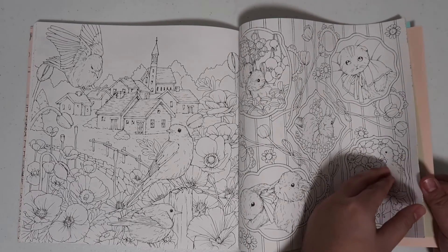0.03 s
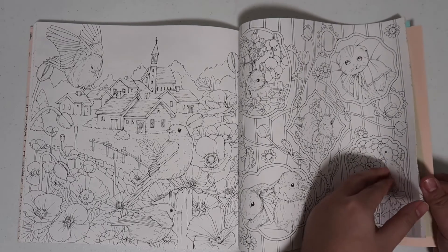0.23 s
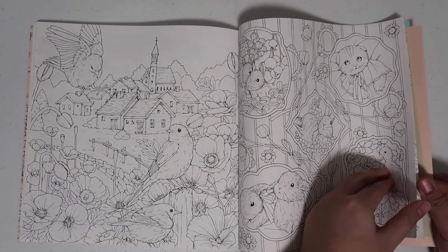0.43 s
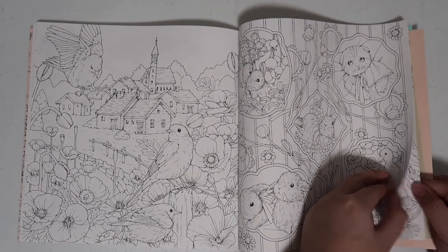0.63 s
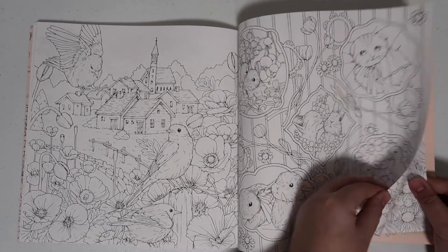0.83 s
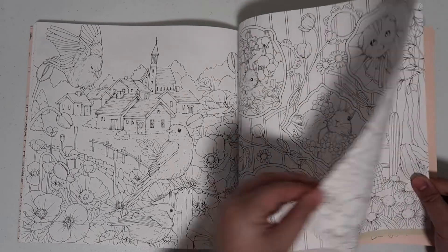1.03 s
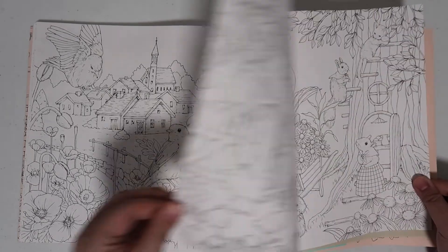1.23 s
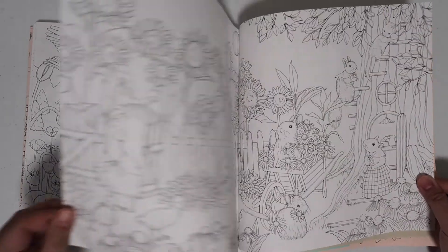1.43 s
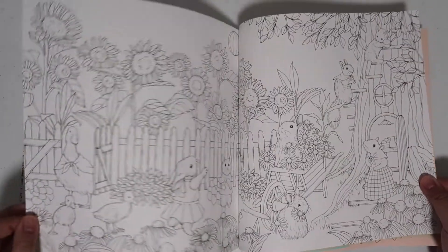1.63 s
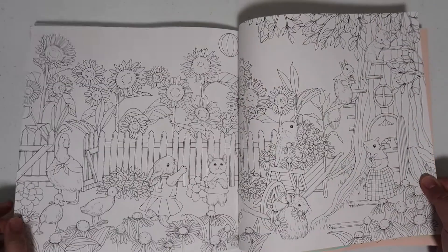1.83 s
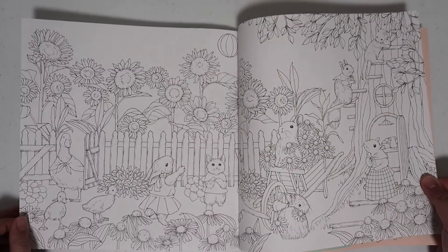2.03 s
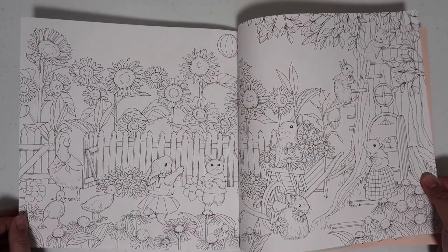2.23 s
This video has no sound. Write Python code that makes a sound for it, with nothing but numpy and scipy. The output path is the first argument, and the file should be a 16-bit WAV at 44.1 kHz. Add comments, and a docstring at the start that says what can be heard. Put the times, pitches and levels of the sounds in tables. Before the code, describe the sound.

A large paper page is turned with a short slide and crisp crackles.

```python
"""A page of a large paper book is turned on a table in a quiet room, over mains hum and low room noise.
First the paper ticks and snaps lightly, and a finger flicks the corner free. The sheet slides off its
neighbour with a hiss of stick-slip friction, then buckles in a run of snaps that deepen as it swings
over; the table and the room reflect each one. Last it settles with faint ticks, soft pats and a brush."""
import sys
import numpy as np
from scipy import signal
from scipy.fft import rfft, irfft, next_fast_len
from scipy.io import wavfile
from scipy.ndimage import map_coordinates

SR = 44100
rng = np.random.default_rng(int(sys.argv[2]) if len(sys.argv) > 2 else 0)


def generate_wav(sig):
    """Save sig (samples, or channels by samples) to the path in sys.argv[1] as 16-bit PCM at SR."""
    pcm = np.round(np.clip(np.atleast_2d(sig).T, -1, 1) * 32767).astype(np.int16)
    wavfile.write(sys.argv[1], SR, pcm)


N = 101429
TIME = np.arange(N) / SR


def amp(db):
    """Amplitude ratio of a level in decibels."""
    return 10 ** (np.asarray(db) / 20)


def unit(x):
    """Normalisation to rms 1."""
    return x / np.sqrt(np.mean(x ** 2) + 1e-20)


def along(points, hz):
    """Interpolation of (f/Hz, value) points on a logarithmic frequency axis."""
    f, values = np.transpose(points)
    return np.interp(np.log(hz + 1), np.log(f + 1), values)


def envelope(points):
    """Amplitude envelope through (t/s, level/dB) points."""
    return amp(np.interp(TIME, *np.transpose(points)))


def wobble(knots_per_s):
    """Random modulation: a smooth curve through Gaussian knots."""
    return map_coordinates(rng.standard_normal(4096), [TIME * knots_per_s], mode="wrap")


def filtered(x, response):
    """Linear filtering: the spectrum is multiplied by a frequency response."""
    n = x.shape[-1]
    size = next_fast_len(n + SR // 2)
    return irfft(rfft(x, size) * response(np.fft.rfftfreq(size, 1 / SR)), size)[..., :n]


def resonance(f, centre_hz, width_hz):
    """Response of a damped oscillator, 1 at its centre."""
    return 1j * f * width_hz / (centre_hz ** 2 - f * f + 1j * f * width_hz)


def add(track, start_s, sound):
    """Superposition of a sound on the track."""
    part = track[:, max(round(start_s * SR), 0):][:, :sound.shape[-1]]
    part += sound[..., :part.shape[1]]


# Stereo width of friction and reverberation: f/Hz, side re mid/dB
STEREO_WIDTH = [(60, -38), (150, -40), (350, -22), (700, -22.5), (1400, -16), (2800, -10), (5500, -3.5),
                (9000, -0.5), (14000, 7)]
def spread(pair, spectrum, width=STEREO_WIDTH):
    """Partial coherence: two independent signals, coloured as mid and side, give left and right; rms 1."""
    def response(hz):
        share = amp(along(width, hz))
        return amp(along(spectrum, hz)) * [np.ones_like(hz), share] / np.hypot(1, share)
    mid, side = filtered(pair, response)
    return unit(np.array([mid + side, mid - side]))


# Partials of the hum: f/Hz, rms level/dB
HUM_PARTIALS = [(58.8, -45.5), (118, -57), (176.4, -54.5), (236.9, -60), (414.5, -65.5)]
def mains_hum(waver_db=3.2):
    """Near-harmonics of the mains frequency, each under slow random amplitude modulation."""
    hum = np.zeros(N)
    for hz, db in HUM_PARTIALS:
        peak = np.sqrt(2) * amp(db + waver_db * wobble(6.87))
        hum += peak * np.sin(2 * np.pi * (hz * TIME + rng.random()))
    return hum


# Spectrum of the room noise: f/Hz, relative level/dB
NOISE_SPECTRUM = [(20, -14), (40, -35), (52, -3.5), (70, -3), (105, -3), (150, -7), (205, -15.5),
                  (260, -13), (360, -16.5), (620, -21), (1300, -22.5), (1800, -30), (2600, -32),
                  (4500, -36.5), (8000, -44.5), (13000, -49.5), (15000, -53)]
# Its stereo width: f/Hz, side re mid/dB
NOISE_WIDTH = [(60, -61), (130, -24.5), (290, -6), (640, -6.5), (1410, -6.5), (3100, 0.5), (6820, 0),
               (15000, 1.5)]
def room_noise(level_db=-44.5):
    """Stationary noise, strongest and most coherent in the bass."""
    return amp(level_db) * spread(rng.standard_normal((2, N)), NOISE_SPECTRUM, NOISE_WIDTH)


# Reverberation time: f/Hz, T60/s
ROOM_DECAY = [(150, 0.21), (600, 0.26), (2500, 0.32), (6000, 0.24), (13000, 0.12)]
# Spectrum of the reverberation: f/Hz, relative level/dB
ROOM_SPECTRUM = [(100, 2), (300, 5.5), (550, 3), (1000, 3.5), (1700, 1.5), (2700, 1.5), (5000, -1.5),
                 (12000, 1)]
def room(x, wet_db=-5.5, build_s=0.0017, table_delay_s=0.0042, table_db=-12):
    """Convolution with the direct path, a reflection off the table and an exponential diffuse tail."""
    hz, t, noise = signal.stft(rng.standard_normal((2, SR // 2)), SR, nperseg=256)
    decay = amp(-60 * t / along(ROOM_DECAY, hz)[:, None])
    tail = spread(signal.istft(noise * decay, SR, nperseg=256)[1], ROOM_SPECTRUM)
    tail *= 1 - np.exp(-np.arange(tail.shape[1]) / SR / build_s)
    response = amp(wet_db) * tail / np.linalg.norm(tail[0]) / np.sqrt(2)
    response[:, 0] += 1
    response[:, round(table_delay_s * SR)] += amp(table_db)
    return signal.fftconvolve(np.atleast_2d(x), response, axes=1)


def friction(spectrum, rough_db, rough_per_s, grains_per_s=2500, grain_share=0.28):
    """Stick-slip friction: fibres catch and let go, making dense grains on a hiss in uneven spurts."""
    caught = rng.random(N) < grains_per_s / SR
    grains = np.sqrt(grain_share) * unit(caught * rng.standard_normal((2, N)))
    hiss = np.sqrt(1 - grain_share) * rng.standard_normal((2, N))
    return unit(spread(grains + hiss, spectrum) * amp(rough_db * wobble(rough_per_s)))


# Spectrum of the brush: f/Hz, relative level/dB
BRUSH_SPECTRUM = [(150, -14), (450, -19), (1400, 2.5), (2600, -9), (5000, -9.5), (7200, -4.5), (9000, -17),
                  (10500, -26), (15000, -26)]
def brush(peak_s=1.889, level_db=-46.5, rise_s=0.016, hold_s=0.019, fall_s=0.025):
    """Friction of the landing edge on the fingers, with exponential rise and fall."""
    t = TIME - peak_s
    stroke = np.exp(np.minimum(t, 0) / rise_s - np.maximum(t - hold_s, 0) / fall_s)
    return amp(level_db) * stroke * friction(BRUSH_SPECTRUM, rough_db=3.0, rough_per_s=260)


# Envelope of the bending rustle: t/s, level/dB
BEND_ENVELOPE = [(.22, -95), (.27, -54), (.36, -66), (.45, -73), (.85, -60), (.90, -49.5), (.962, -40.5),
                 (1.0, -39.5), (1.04, -46), (1.10, -49), (1.22, -45), (1.27, -41), (1.33, -41.5),
                 (1.375, -45.5), (1.43, -51), (1.50, -55), (1.75, -56.5), (2.05, -60), (2.3, -85)]
# Its spectrum: f/Hz, relative level/dB
BEND_SPECTRUM = [(120, -17), (400, 9), (700, 5.5), (1100, -2.5), (1650, 1.5), (2500, -3), (4500, -11),
                 (8000, -21.5), (15000, -31.5)]
def bending():
    """Friction of fibres: the sheet rustles as it bends over."""
    return envelope(BEND_ENVELOPE) * friction(BEND_SPECTRUM, rough_db=4.5, rough_per_s=100)


# Envelopes of the sliding sheet and of its scraping corner: t/s, level/dB
SLIDE_ENVELOPE = [(.574, -82), (.586, -49.5), (.642, -45.5), (.692, -44.5), (.707, -36), (.725, -43),
                  (.765, -44), (.795, -42), (.84, -52), (.862, -49.5), (.875, -44), (.90, -46),
                  (.928, -39.5), (.955, -42), (.98, -75), (1.05, -64), (1.12, -90)]
SCRAPE_ENVELOPE = [(.575, -83), (.595, -56.5), (.65, -55), (.69, -70), (.72, -100)]
# Spectra of the slide's body and of its treble sizzle: f/Hz, relative level/dB
SLIDE_SPECTRUM = [(150, -21), (500, -6.5), (900, -4), (1500, -2), (2200, -1.5), (3100, 0.5), (4500, -5.5),
                  (6800, -5.5), (8200, -14.5), (12500, -17.5), (15500, -29)]
SIZZLE_SPECTRUM = [(3000, -40), (7000, -8), (9500, -1.5), (13000, -1), (15500, -2)]
# Resonances of the sliding sheet: f/Hz, bandwidth/Hz, relative level/dB
SHEET_MODES = [(1380, 60, -5), (3115, 19, 2), (3830, 35, -12)]
def sliding(sizzle_db=-12.5, sizzle_exponent=1.16, scrape_hz=3310, scrape_width_hz=160):
    """Forced vibration: the corner scrapes, then friction on the next page drives the sheet's modes."""
    grit = lambda spectrum: friction(spectrum, rough_db=1.0, rough_per_s=220, grains_per_s=900)
    modes = lambda f: 1 + sum(amp(db) * resonance(f, hz, width) for hz, width, db in SHEET_MODES)
    push = envelope(SLIDE_ENVELOPE)
    body = filtered(push * grit(SLIDE_SPECTRUM), modes)
    swell = push.max() * (push / push.max()) ** sizzle_exponent  # the treble grows faster than the body
    sizzle = amp(sizzle_db) * swell * grit(SIZZLE_SPECTRUM)
    scrape = unit(filtered(grit(SLIDE_SPECTRUM), lambda f: resonance(f, scrape_hz, scrape_width_hz)))
    return envelope(SCRAPE_ENVELOPE) * scrape + body + sizzle


# Modes of the stiff corner: f/Hz, level/dB, T60/s
CORNER_MODES = [(1395, -24.5, 0.011), (2470, -33, 0.014)]
def corner_flick(start_s=0.3212, attack_s=0.00071):
    """Damped free vibration: the corner rings for a moment as a finger flicks it free."""
    out, t = np.zeros((2, N)), np.arange(SR // 20) / SR
    ring = sum(amp(db - 60 * t / t60) * np.sin(2 * np.pi * hz * t) for hz, db, t60 in CORNER_MODES)
    add(out, start_s, room(ring * (1 - np.exp(-t / attack_s))))
    return out


def pulse(pitch_hz, treble_hz, q=1.115, slope=2.65, size=1024):
    """A flipping patch of paper radiates a sharp suction and a broader push; larger patches sound lower."""
    f = np.fft.rfftfreq(size, 1 / SR)
    ratio = f / pitch_hz
    gain = ratio / np.hypot(1 - ratio ** 2, ratio / q) / np.hypot(1, (f / treble_hz) ** slope)
    gain[0] = gain[1] / 10
    cepstrum = irfft(np.log(gain))
    cepstrum[1:size // 2] *= 2  # folding the cepstrum gives minimum phase
    cepstrum[size // 2 + 1:] = 0
    wave = irfft(np.exp(rfft(cepstrum)))
    return -wave / np.abs(wave).max()


def crinkle(pitch_hz, treble_hz, decay_s):
    """An exponentially dying burst of tiny random impulses, each shaped as the same pulse."""
    t = np.arange(SR // 10) / SR
    burst = rng.standard_normal(len(t)) * rng.exponential(size=len(t)) * np.exp(-t / decay_s)
    return signal.fftconvolve(pulse(pitch_hz, treble_hz), burst / np.linalg.norm(burst))


# Pats of the sheet on the pile: t/s, level/dB, pitch/Hz, treble cutoff/Hz, decay time/s
LANDING_PATS = [(1.890, -20, 580, 2350, 0.0099), (1.989, -26.5, 284, 1300, 0.022)]
def landing():
    """Distributed impact: contact spread out in time makes each pat soft."""
    out = np.zeros((2, N))
    for start_s, db, pitch_hz, treble_hz, decay_s in LANDING_PATS:
        add(out, start_s, amp(db) * room(crinkle(pitch_hz, treble_hz, decay_s)))
    return out


CRINKLE_LEAD_S = 0.0006
def crack(pitch_hz, treble_hz, rebound_s, rebound_db, crinkle_db):
    """Elastic rebound: a flip and its delayed opposite, wrapped in a higher crinkle of tiny slips."""
    flip = pulse(pitch_hz, treble_hz)
    out = amp(crinkle_db) * crinkle(1.96 * pitch_hz, treble_hz, decay_s=0.0049)[None]
    add(out, CRINKLE_LEAD_S, flip)
    add(out, CRINKLE_LEAD_S + rebound_s, -amp(rebound_db) * flip)
    return out


# Ticks of the paper's edge: t/s, level/dB, pitch/Hz, treble cutoff/Hz
EDGE_TICKS = [(0.2588, -38, 1300, 3080), (0.268, -36, 1290, 1900), (1.557, -33, 1290, 4950),
              (1.672, -42, 3080, 4530), (1.746, -37.5, 1290, 3480), (1.772, -41, 1500, 4000),
              (2.090, -37.5, 1410, 4020), (2.154, -38, 1520, 4000), (2.253, -42, 2020, 4600)]
def edge_ticks():
    """Local buckling: small patches at the edge flip and spring back."""
    out = np.zeros((2, N))
    for start_s, db, pitch_hz, treble_hz in EDGE_TICKS:
        tick = crack(pitch_hz, treble_hz, rebound_s=0.00052, rebound_db=-3.5, crinkle_db=-11)
        add(out, start_s - CRINKLE_LEAD_S, amp(db) * room(tick))
    return out


def curved_sheet(x, dip_hz, dip_db, ring_hz, ring_db):
    """Antiresonance and resonance: the curved sheet swallows one band and rings in another."""
    bump = lambda f, hz, db, q: 1 + (amp(db) - 1) * resonance(f, hz, hz / q)
    return filtered(x, lambda f: bump(f, ring_hz, ring_db, q=6) / bump(f, dip_hz, dip_db, q=2))


# Snaps of the sheet, with the later levels relative to the snap's own: t/s, level/dB, pitch/Hz,
# treble cutoff/Hz, rebound delay/s, rebound/dB, crinkle/dB, thump/dB, thump/Hz, dip/Hz, dip depth/dB,
# ring/Hz, ring gain/dB, treble fizz/dB
BUCKLING_SNAPS = [(0.28, -36, 1470, 5970, .00034, 1, 5.5, -22, 260, 1900, 10, 5550, 1.5, -14),
                  (0.8962, -33.5, 1190, 4000, .00028, 5.5, -10, -17, 257, 2800, 0, 4000, -7, -24),
                  (0.925, -22, 1270, 5400, .0004, -8, 0, -27, 260, 2800, 5, 4000, -12, -24),
                  (0.9587, -18, 990, 4000, .00067, -1, 8, -10.5, 400, 3400, 6, 2100, -2.5, -26),
                  (0.9909, -16.5, 880, 5860, .00028, -2, -1, -15, 300, 3700, 3.5, 6200, -5, -14),
                  (1.0265, -14.5, 850, 4600, .00035, -3, -5, -18, 402, 2900, 3.5, 3900, 4.5, -18),
                  (1.1261, -11.5, 770, 4260, .00039, 3.5, -6.5, -15, 410, 2680, 1.5, 690, 3, -20),
                  (1.234, -6, 650, 4000, .00059, -7, -4, -11, 255, 1570, 3.5, 2730, 3, -27),
                  (1.2889, -27, 3280, 4670, .00015, -4, 1, -5, 398, 1700, 2, 3620, 7.5, -9),
                  (1.2897, -20, 774, 1520, .00059, -2, 4.5, 1.5, 290, 1510, 13, 920, 8, -20),
                  (1.3566, -27, 600, 1200, .00063, -6, -10, -26, 259, 1300, 6, 660, 9, -26),
                  (1.3634, -10, 646, 4240, .00058, -11, -9.5, -8, 168, 1240, 4.5, 2670, 6.5, -19.5)]
def buckling(thump_lag_s=0.0006):
    """Snap-through buckling: a crack and a thump of air, with a brief, wide fizz of high treble."""
    out = np.zeros((2, N))
    for (start_s, db, pitch_hz, treble_hz, rebound_s, rebound_db, crinkle_db,
         thump_db, thump_hz, dip_hz, dip_db, ring_hz, ring_db, fizz_db) in BUCKLING_SNAPS:
        snap = crack(pitch_hz, treble_hz, rebound_s, rebound_db, crinkle_db)
        add(snap, CRINKLE_LEAD_S + thump_lag_s, -amp(thump_db) * pulse(thump_hz, treble_hz=980))
        snap = curved_sheet(snap, dip_hz, dip_db, ring_hz, ring_db)
        add(out, start_s - CRINKLE_LEAD_S, amp(db) * room(snap))
        fizz = np.array([crinkle(pitch_hz=8800, treble_hz=11800, decay_s=0.0038) for _ in range(2)])
        add(out, start_s, amp(db + fizz_db) * fizz)
    return out


# Drift of the page: t/s, left minus right level/dB
PAGE_DRIFT = [(.95, 1.2), (1.25, 0.3), (1.9, -0.8)]
def scene():
    """Superposition: over the background, a level difference carries the page slightly left to right."""
    page = corner_flick() + buckling() + edge_ticks() + landing()
    page += room(sliding() + bending() + brush(), wet_db=-16)[:, :N]
    balance_db = np.interp(TIME, *np.transpose(PAGE_DRIFT))
    return mains_hum() + room_noise() + page * amp([balance_db / 2, -balance_db / 2])


def record(dry, cutoff_hz=14100, order=15, limit_hz=15400):
    """Low-pass filtering: the top treble rolls off, and nothing passes above the band limit."""
    return filtered(dry, lambda hz: (hz < limit_hz) / np.hypot(1, (hz / cutoff_hz) ** order))


dry = scene()
out = record(dry)
generate_wav(out)
```